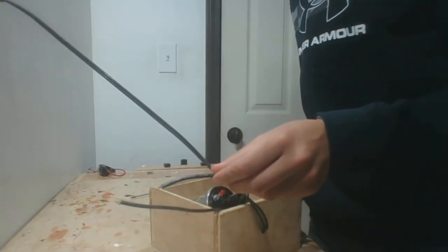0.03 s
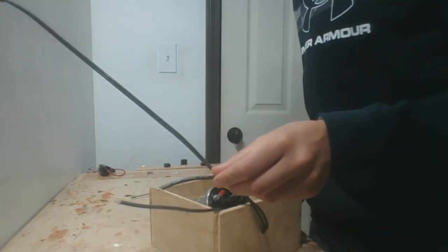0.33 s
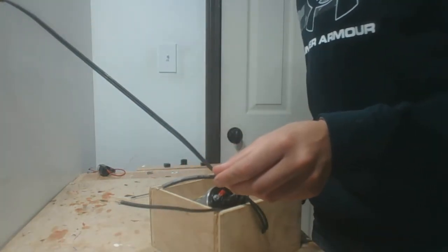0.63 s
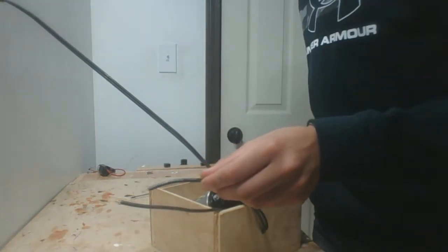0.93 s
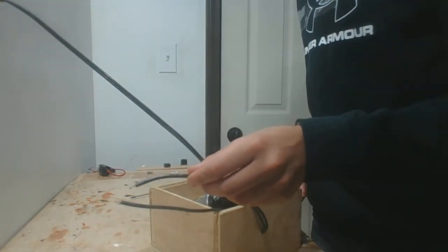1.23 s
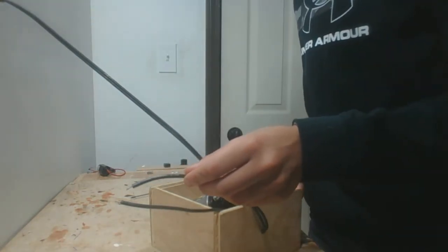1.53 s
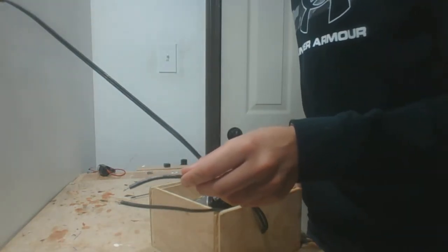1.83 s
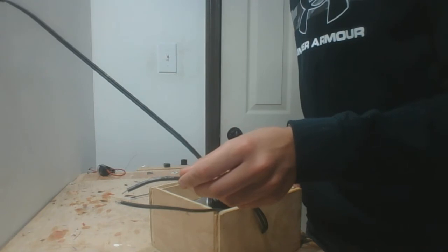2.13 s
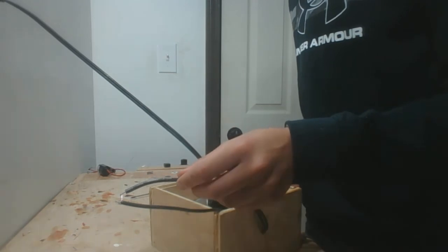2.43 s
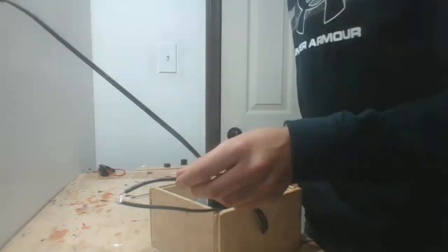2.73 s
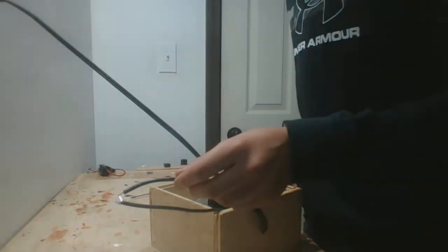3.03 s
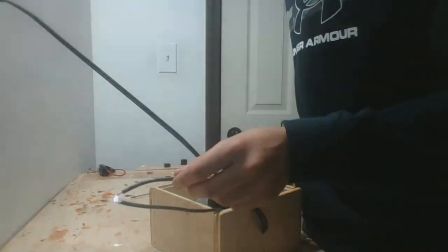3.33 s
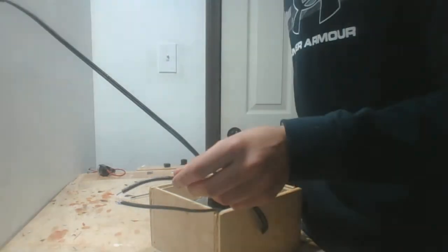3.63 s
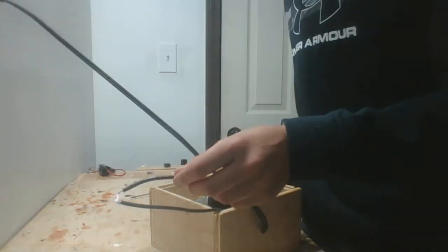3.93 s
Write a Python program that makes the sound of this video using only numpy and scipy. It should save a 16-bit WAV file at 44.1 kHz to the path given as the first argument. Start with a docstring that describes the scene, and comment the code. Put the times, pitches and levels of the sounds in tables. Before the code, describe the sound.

An electric discharge builds from buzzing to sparking in a small, faintly humming room. At about 0.4 seconds a thin, high, fizzy buzz begins and grows steadily louder and fuller. Small spitting clicks appear around 2.1 seconds. From 2.5 seconds to the end at 4, loud, harsh sparks crack singly and in rapid bursts, overloading the microphone, with the longest run from about 3.2 to 3.8 seconds.

```python
"""An electric discharge buzzes, then sparks, as a high-voltage wire nears a terminal on a wooden bench.
Corona ionises the air on every half-wave of the mains, growing louder and fuller as the gap closes.
Streamers spit, then the gap breaks down: runs of sparks, one per mains cycle, crack into a small,
faintly humming room and overload the microphone."""
import sys
import numpy as np
from scipy import signal
from scipy.fft import rfft, irfft
from scipy.io import wavfile
from scipy.ndimage import uniform_filter1d

SR = 44100
rng = np.random.default_rng(int(sys.argv[2]) if len(sys.argv) > 2 else 0)


def int16_out(signal):
    """Quantize to a 16-bit WAV file."""
    q = np.round(np.clip(np.atleast_2d(signal).T, -1, 1) * 32767)
    wavfile.write(sys.argv[1], SR, q.astype(np.int16))


N = 176400
MAINS_HZ, BURST_S = 60, .0024


def amp(db):
    """Amplitude ratio: tenfold for every 20 dB."""
    return 10 ** (np.asarray(db) / 20)


def unit_rms(x):
    """Normalisation to a mean power of 1."""
    return x / np.sqrt(np.mean(x ** 2) + 1e-20)


def unit_energy(x):
    """Normalisation to a total energy of 1."""
    return x / (np.linalg.norm(x) + 1e-12)


def spectrum_at(points, hz):
    """Interpolation on a log-frequency axis."""
    f, value = np.transpose(points)
    return np.interp(np.log(hz + 1), np.log(f), value)


def add(mix, start_s, sound):
    """Superposition: a sound adds to the mix from its start time."""
    part = mix[max(0, round(start_s * SR)):][:len(sound)]
    part += sound[:len(part)]


def through(x, response):
    """Convolution with an impulse response, cut to the input's length."""
    return signal.fftconvolve(x, response)[:len(x)]


def colour(x, points, size=8192):
    """Minimum-phase filtering: the Hilbert transform of the log gain sets the phase."""
    log_gain = np.log(amp(spectrum_at(points, abs(np.fft.fftfreq(size, 1 / SR)))))
    response = np.fft.ifft(np.exp(np.conj(signal.hilbert(log_gain)))).real
    return through(x, response[:size // 2])


def band(x, lo, hi):
    """Steep band-pass filtering, normalised to rms 1."""
    return unit_rms(signal.sosfilt(signal.butter(4, (lo, hi), 'band', fs=SR, output='sos'), x))


def flatten(x, size=8192):
    """Whitening: division by the smoothed spectrum removes the broad colour of a short response."""
    spectrum = rfft(x, size)
    power = abs(uniform_filter1d(abs(spectrum) ** 2, 45))
    return unit_energy(irfft(spectrum / np.sqrt(power + 1e-12))[:len(x)])


def scatter(span_s, count):
    """Irregular impulses of random sign and falling size, as in a train of early reflections."""
    taps = np.zeros(SR // 2)
    position = (np.arange(count) + 1 + rng.random(count)) / (count + 1)
    np.add.at(taps, (position * span_s * SR).astype(int), rng.choice([-1, 1], count) * (1 - position / 2))
    return unit_energy(taps)


def room_tail():
    """Reverberation: a diffuse field builds up, then decays exponentially at each frequency's own rate."""
    # Each row: frequency in Hz, time to decay by 60 dB in seconds.
    decay_times = [(100,0.18),(500,0.11),(2000,0.15),(4000,0.22),(8000,0.36)]
    sparse = rng.standard_normal(SR // 2) * (rng.random(SR // 2) < .1)
    hz, t, spectra = signal.stft(sparse, SR, nperseg=256)
    decay = amp(-60 * t / spectrum_at(decay_times, hz)[:, None])
    tail = signal.istft(spectra * decay, SR, nperseg=256)[1][:SR // 2]
    build_up = np.minimum(np.arange(len(tail)) / SR / .0087, 1)
    return unit_energy(tail * build_up)


def background():
    """The room's noise floor: a continuous spectrum plus the harmonic lines of a low hum."""
    # Each row: frequency in Hz, relative noise level in dB.
    noise_spectrum = [(20,-36),(35,-26.5),(60,-22.5),(120,-18.5),(250,-19.5),(500,-24),(900,-23),(1200,-28),(2500,-31),(6500,-36.5),(8000,-54.5)]
    # Each row: frequency in Hz, level in dB.
    hum_partials = [(90, -68.5), (180, -82.5), (270, -88.5)]
    t = np.arange(N) / SR
    noise = colour(rng.standard_normal(N), noise_spectrum)
    hum = sum(amp(db) * np.sqrt(2) * np.sin(2 * np.pi * (hz * t + rng.random())) for hz, db in hum_partials)
    return amp(-68) * unit_rms(noise) + hum


def corona_pulses():
    """Ionisation occurs at either polarity, so pulses come at twice the mains frequency."""
    # The reverse half-wave is weaker. Each row: time in seconds, its relative level in dB.
    imbalance = [(.4, -3.5), (1.3, -4.5), (1.8, -4.8), (1.95, -7.5), (2.2, -6.5), (2.4, -3), (4, -12.5)]
    # Ignition comes earlier as the gap closes. Each row: time in seconds, lead in seconds.
    lead = [(.4,0),(.56,.00005),(.66,-.0001),(.95,-.0001),(1.25,.0002),(2.4,.0003)]
    times = np.arange(.4066, N / SR, 1 / (2 * MAINS_HZ))
    reverse_db = np.arange(len(times)) % 2 * np.interp(times, *np.transpose(imbalance))
    sizes = amp(reverse_db + .35 * rng.standard_normal(len(times)))
    times = times - np.interp(times, *np.transpose(lead)) + 6e-6 * rng.standard_normal(len(times))
    pulses, taps = np.zeros(N), np.arange(-8, 9)
    for s, size in zip(times, sizes):  # a windowed sinc places each pulse between samples
        add(pulses, s, size * np.sinc(taps - s * SR + round(s * SR)) * np.hanning(len(taps)))
    return pulses


def corona():
    """Periodic repetition of a burst of tiny discharges makes a buzz; its random part makes a fizz."""
    # Rasp as new points ignite. Each row: time in seconds, fizz relative to the buzz in dB.
    fizz_levels = [(.4,-13),(.54,-13),(.59,-4),(.72,-12),(.93,-12),(1.05,-6),(1.22,-7),(1.35,-12),(1.8,-12),(2.3,-7),(4,-7)]
    # Spectra of faint and of strong corona. Each row: frequency in Hz, gain in dB.
    faint_spectrum = [(300,-7),(2600,-21),(3000,-9.5),(3250,-28),(3550,-1),(4100,-13),(4650,0),(5050,-13),(5450,-10.5),(6000,-1),(6400,-8),(6750,-4),(7600,-20)]
    strong_spectrum = [(300,-27),(500,-22),(750,-27),(1080,-20),(1300,-24),(1700,-19),(2000,-18),(2500,-11),(3000,-11),(3220,-14),(3550,-3.5),(3900,-5),(4150,-13),(4600,-5),(5050,-7),(5350,-2),(5850,0),(6350,0),(6650,-9),(7000,-13),(7700,-20)]
    # Bands from the highest down. Each row: lower edge in Hz, upper edge in Hz.
    bands = [(5200, 9000), (3200, 5200), (2050, 3200), (1550, 2050), (250, 1550)]
    # Growth, then the level held from breakdown on. Each row: time in seconds, each band's level in dB.
    growing = [(0.42, -54, -56, -72.5, -79, -87), (0.792, -61.5, -64, -76, -90, -74.5),
               (0.84, -61.5, -63, -73, -95, -84), (0.88, -58.5, -62, -81, -84, -84),
               (1.024, -56.5, -57.5, -79, -92, -71), (1.108, -53, -56, -73, -73, -75),
               (1.19, -50.5, -53.5, -87, -74, -73), (1.302, -48.5, -52.5, -66, -80, -76),
               (1.63, -46.5, -50.5, -57.5, -73, -69), (1.738, -46.5, -50.5, -60, -79, -68),
               (1.868, -43, -48.5, -55, -62, -69.5), (2.16, -43, -47, -54, -60, -62)]
    held = [(2.45,-38.5,-44,-50.5,-55,-62)]
    t = np.arange(N) / SR
    pulses = corona_pulses()
    progress = np.arange(1024) / SR / BURST_S
    envelope = unit_energy(np.sin(np.pi * np.minimum(progress, 1)))
    buzz = through(pulses, flatten(envelope * rng.standard_normal(len(envelope))))
    fizz_gain = amp(np.interp(t, *np.transpose(fizz_levels)))
    buzz += fizz_gain * through(pulses, envelope) * rng.standard_normal(N)
    bench = amp(-9) * scatter(span_s=.009, count=30)[:SR // 20]
    bench[0] += 1  # direct sound
    buzz = through(buzz, flatten(bench))
    buzz += amp(-6.5) * through(buzz, room_tail())
    faint, strong = colour(buzz, faint_spectrum), colour(buzz, strong_spectrum)
    grown = np.interp(t, (.83, 1.39), (0, 1))
    times, *band_levels = np.transpose([*growing, *held])
    out = np.zeros(N)
    for db, edges in zip(band_levels, bands):
        blend = (1 - grown) * band(faint, *edges) + grown * band(strong, *edges)
        out += amp(np.interp(t, times, db)) * blend
    return out


def spits():
    """Partial discharge: streamers that do not yet bridge the gap each emit a cluster of clicks."""
    # Each row: start in seconds, relative level in dB.
    streamers = [(2.1230,-10.5),(2.173,-17),(2.189,-3.5),(2.2236,-16.5),(2.239,-2.5),(2.256,1),(2.2732,2.5),(2.2883,-12),(2.306,-5),(2.3230,-10.5),(2.439,-9),(2.4557,-2)]
    # Each row: frequency in Hz, gain in dB.
    spit_spectrum = [(100,-35),(400,-1),(800,-19),(1400,-5.5),(2000,-2),(4000,1.5),(6000,4.5),(8000,1.5)]
    clicks = np.zeros(N)
    for start, db in streamers:
        add(clicks, start, amp(db - 5) * flatten(scatter(BURST_S, count=14)[:SR // 50]))
    return colour(clicks + amp(-12) * through(clicks, room_tail()), spit_spectrum)


def snap(crackles_per_s=4000, decay_s=.0024):
    """The shock wave of one spark: an impulse followed by an exponentially dying crackle."""
    t = np.arange(SR // 50) / SR
    crackle = rng.standard_normal(len(t)) * (rng.random(len(t)) < crackles_per_s / SR)
    pressure = amp(-1.5) * unit_energy(crackle * np.exp(-t / decay_s))
    pressure[0] += 1
    return flatten(pressure)


def spark_echoes():
    """Multipath propagation from one spark: direct sound, bench and wall reflections, diffuse tail."""
    bench = amp(-7) * scatter(span_s=.0035, count=14)
    walls = amp(-6) * scatter(span_s=.022, count=24)
    early = bench + walls
    early[0] += 1
    response = amp(-8.5) * room_tail()
    add(response, 0, flatten(early[:SR // 10]))
    return response


def sparks(thump_hz=71, thump_decay_s=.0034, shared_part=.35):
    """Dielectric breakdown: each spark cracks along a new path, and the heated air expands with a thump."""
    # Runs of sparks; those on the reverse half-wave overlap the others.
    # Each row: start in seconds, length in seconds, relative level in dB, depth of the pressure trough.
    runs = [(2.4726,.008,0,0),(2.5069,.025,0,0.21),(2.5425,.008,-0.5,0.32),(2.572,.058,1,0.13),(2.657,.008,-3,0.033),(2.756,.025,0,0.0041),(2.8396,.025,1.5,0.0032),(2.9223,.008,-2,0.08),(2.957,.042,-1.5,0.0033),(3.0396,.008,-2.5,0),(3.0892,.008,1,0),(3.1560,.008,-1,0),(3.2235,.441,0.5,0.0013),(3.348,.008,-1.5,0.39),(3.3991,.025,-6,0.4),(3.4983,.125,-3.5,0.37),(3.6876,.125,0,0),(3.724,.008,-1,0.24),(3.8394,.075,-0.5,0.0045),(3.94,.058,-0.5,0)]
    # Each row: frequency in Hz, gain in dB.
    crack_spectrum = [(40,-26),(120,4),(250,4),(500,5),(1000,2),(2000,1.5),(3000,2),(4500,1),(6300,1),(8000,-6)]
    cracks, thumps = np.zeros((2, N))
    t = np.arange(SR // 20) / SR
    age = np.maximum(t - .0021, 0)  # the thump lags the crack
    swell = amp(-9.5) * np.sin(2 * np.pi * thump_hz * age) * np.exp(-age / thump_decay_s)
    trough = np.exp(-((t - .00088) / .0019) ** 2)
    shared_echoes = spark_echoes()  # the pattern that stays while the spark wanders
    for start, length, db, depth in runs:
        for s in start + np.arange(0, length, 1 / MAINS_HZ):
            jitter_s, crack_db, thump_db = rng.standard_normal(3) * (.0002, 1.2, 1)
            shock = snap()
            echoes = np.sqrt(shared_part) * shared_echoes + np.sqrt(1 - shared_part) * spark_echoes()
            add(cracks, s + jitter_s, amp(17 + db + crack_db) * signal.fftconvolve(shock, echoes))
            add(thumps, s + jitter_s, amp(db + thump_db) * (swell - depth * trough))
    return colour(cracks, crack_spectrum) + thumps


def scene():
    """Superposition: the pressures of all sources add at the microphone."""
    return (corona() + spits() + sparks() + background())[None]


def record(dry, low_cut_hz=34.5, high_cut_hz=8123):
    """Asymmetric saturation in the microphone, then clipping and band limiting in the recorder."""
    # Each row: frequency in Hz, gain in dB.
    microphone_response = [(20,13),(50,5),(120,1),(250,-3),(500,-2.5),(1000,1.5),(2000,1),(4000,0),(6300,0.5),(7000,-2),(7500,-18.5),(8000,-27.5)]
    pressure = dry[0]
    ceiling = np.where(pressure > 0, .35, .87)  # compression saturates sooner than rarefaction
    heard = colour(ceiling * np.tanh(pressure / ceiling), microphone_response)
    heard = signal.lfilter(*signal.butter(1, low_cut_hz, 'high', fs=SR), heard)
    clipped = np.clip(heard, -.9, .9)
    low_pass = signal.firwin(511, high_cut_hz, window=("kaiser", 9), fs=SR)
    return signal.fftconvolve(clipped, low_pass, "same")[None]


dry = scene()
out = record(dry)
int16_out(out)
```